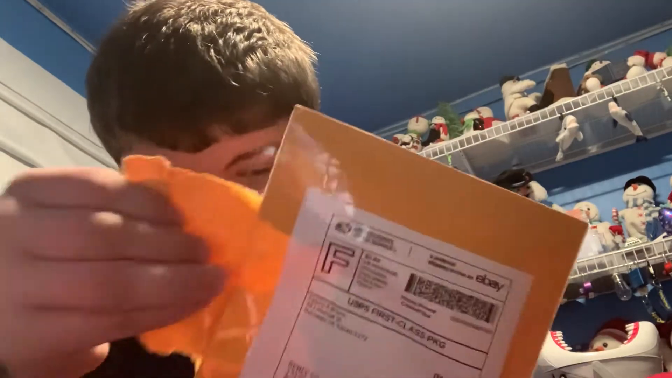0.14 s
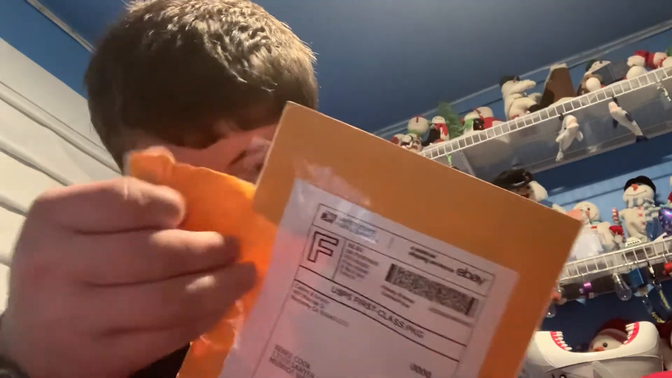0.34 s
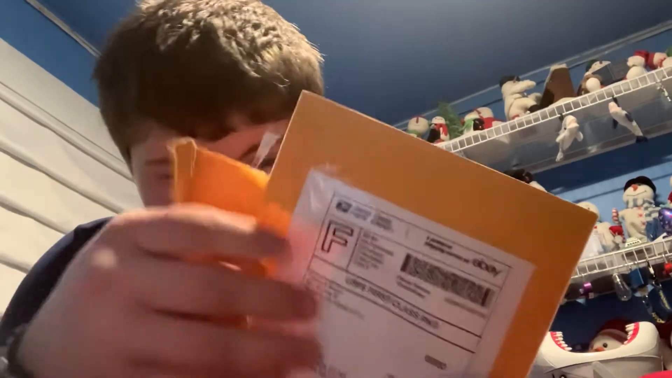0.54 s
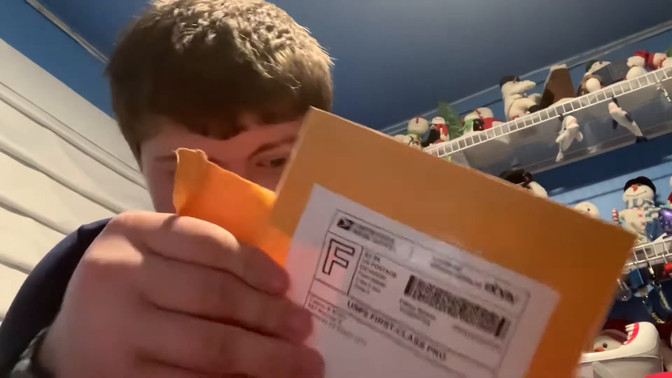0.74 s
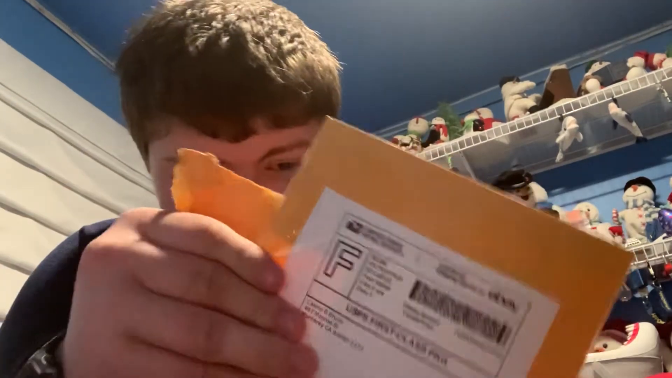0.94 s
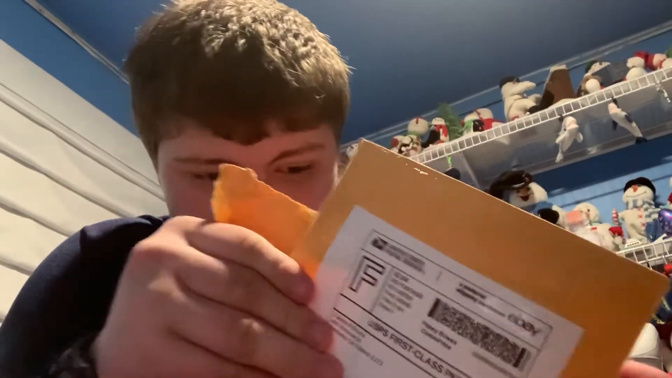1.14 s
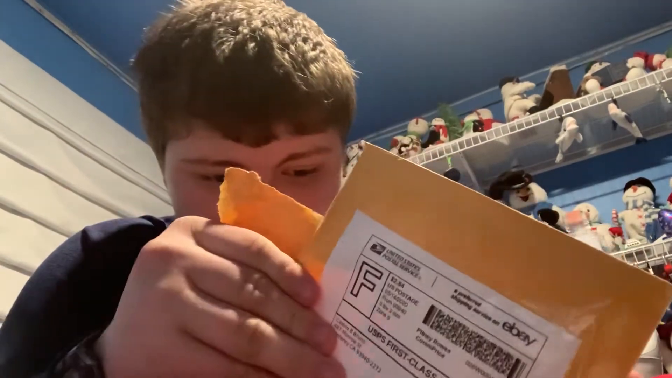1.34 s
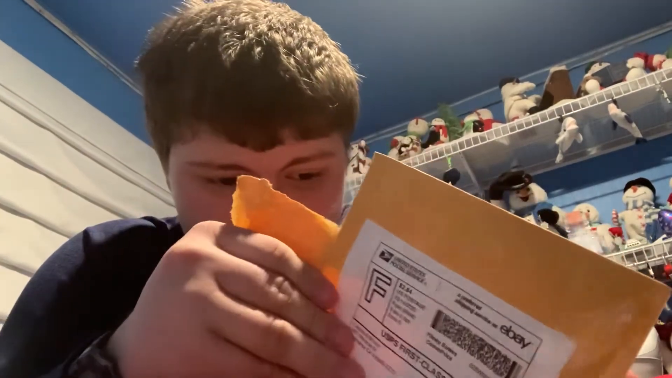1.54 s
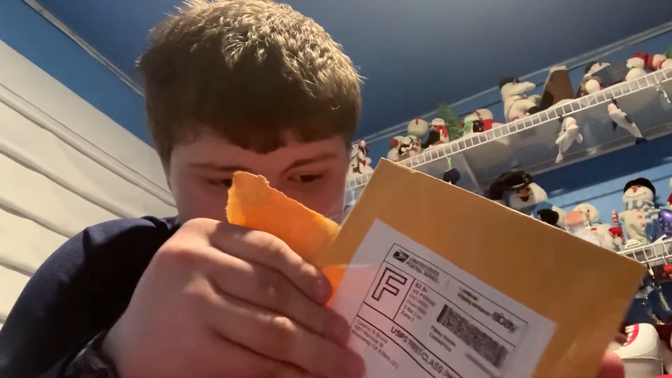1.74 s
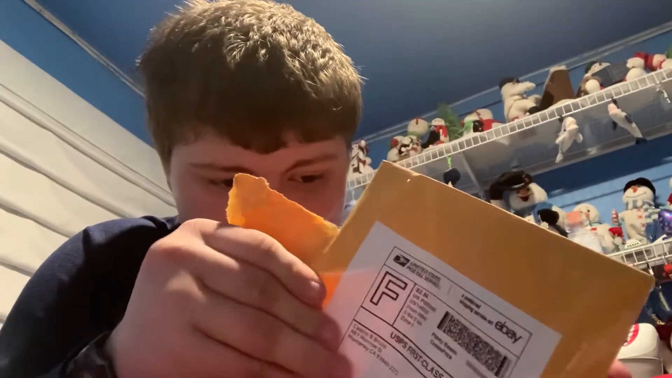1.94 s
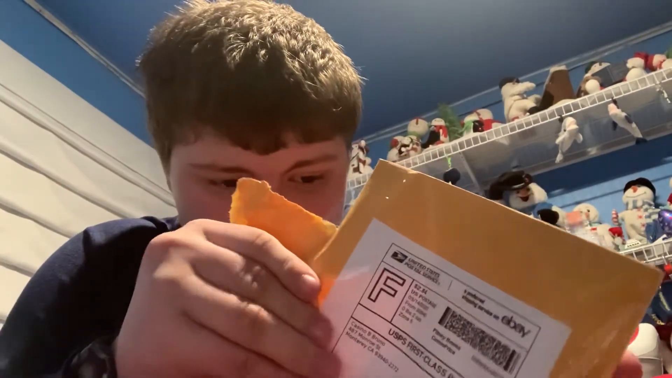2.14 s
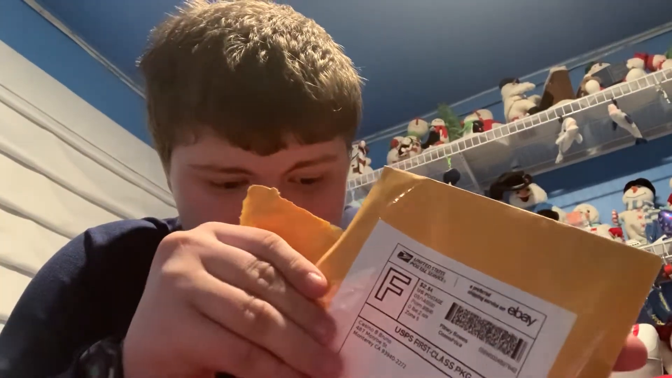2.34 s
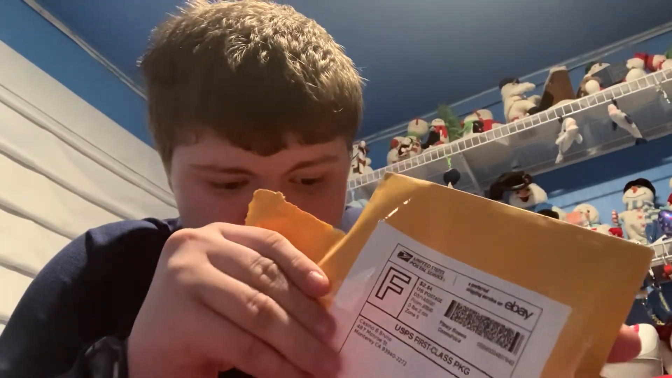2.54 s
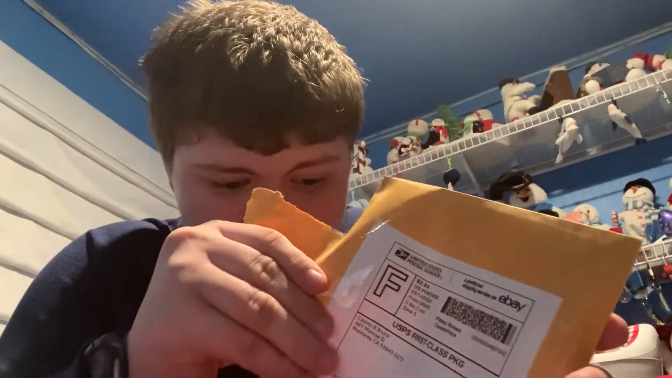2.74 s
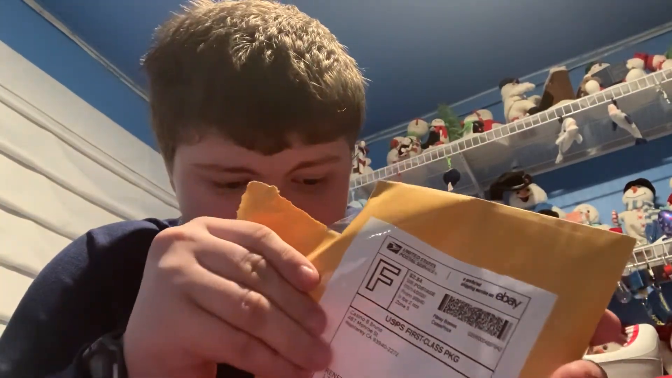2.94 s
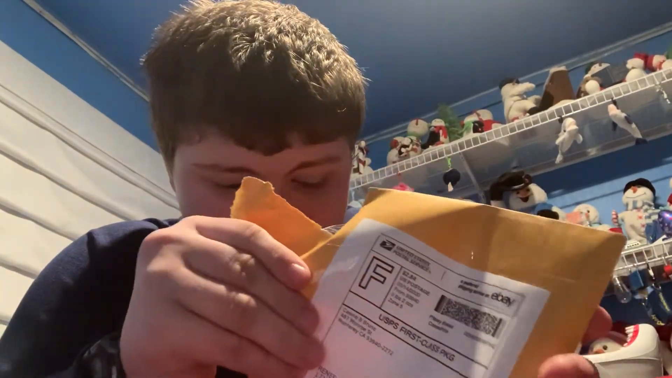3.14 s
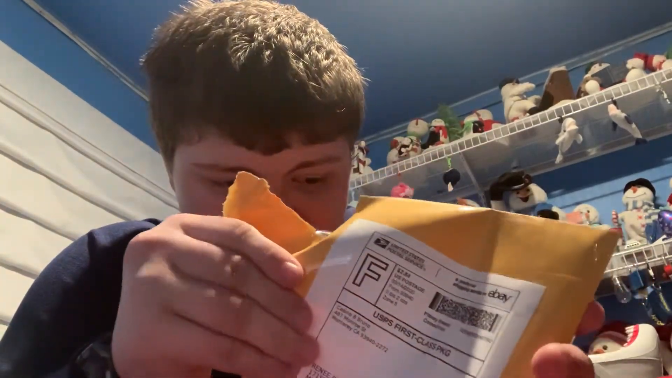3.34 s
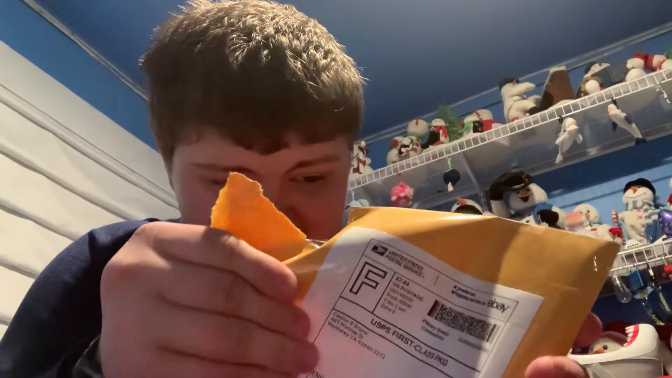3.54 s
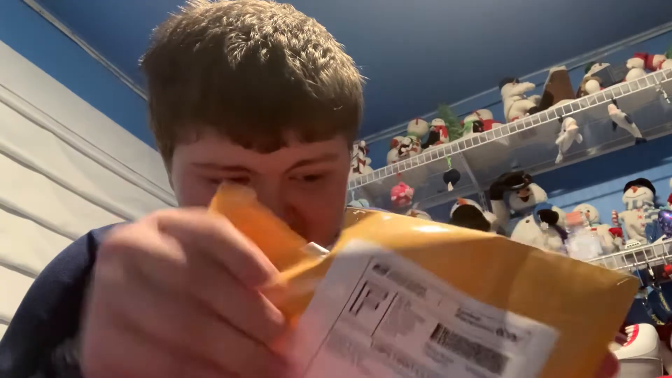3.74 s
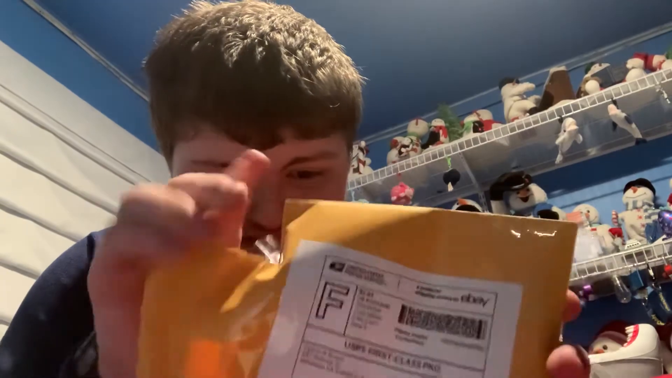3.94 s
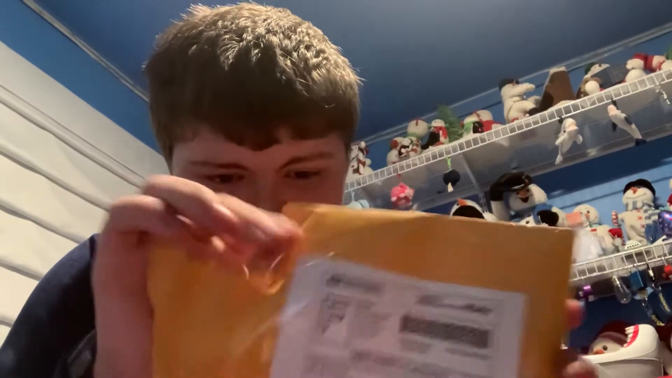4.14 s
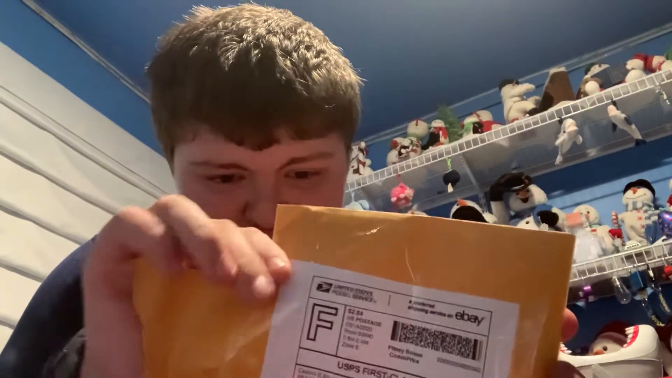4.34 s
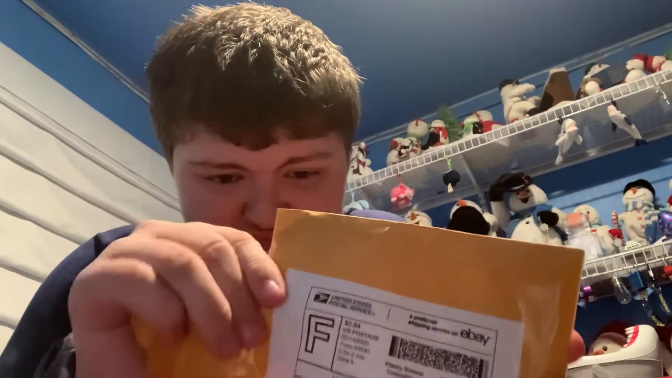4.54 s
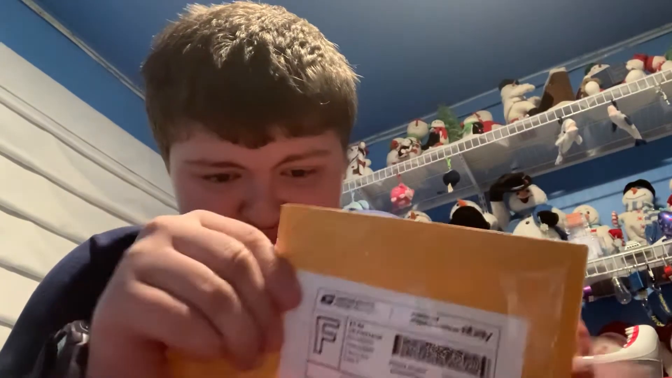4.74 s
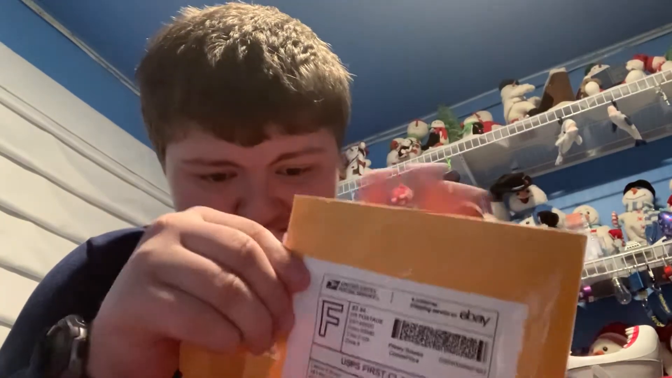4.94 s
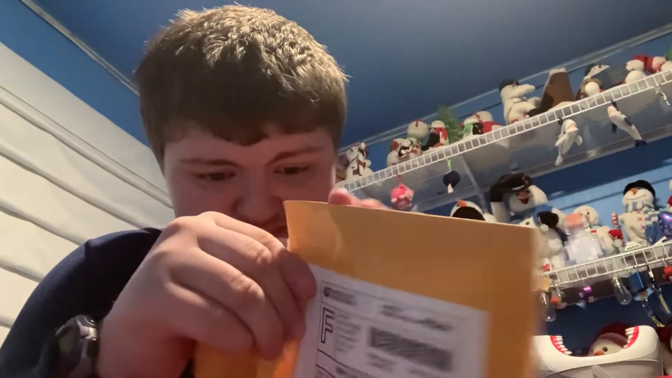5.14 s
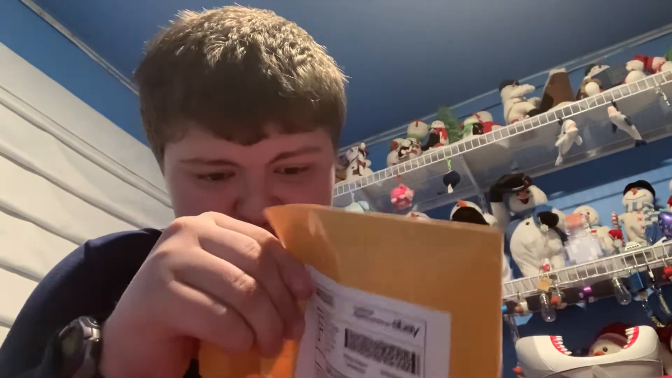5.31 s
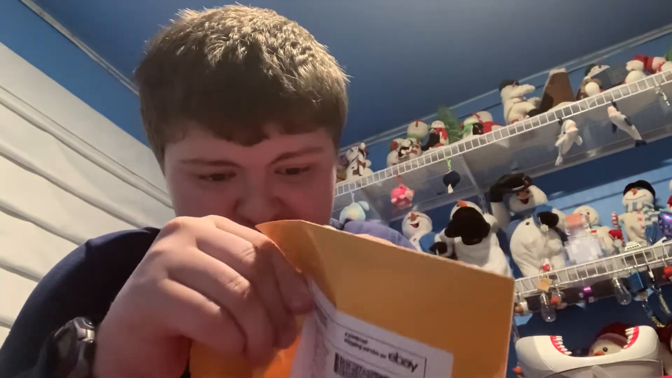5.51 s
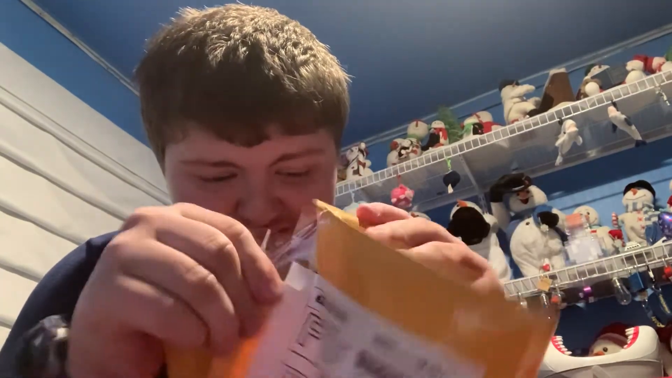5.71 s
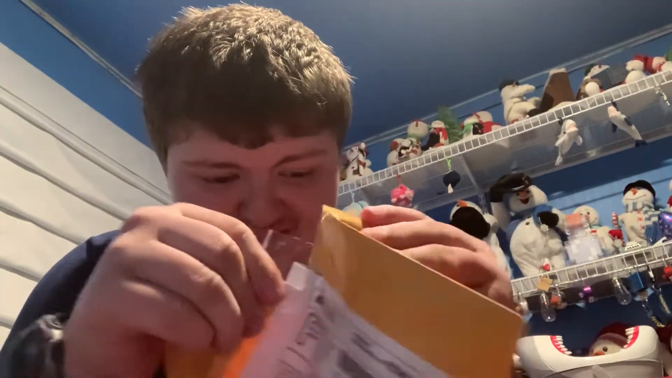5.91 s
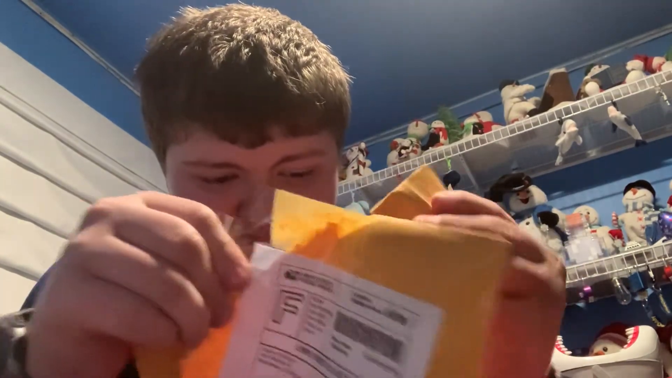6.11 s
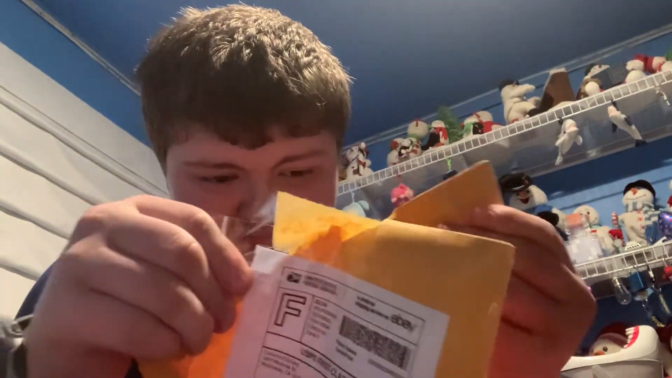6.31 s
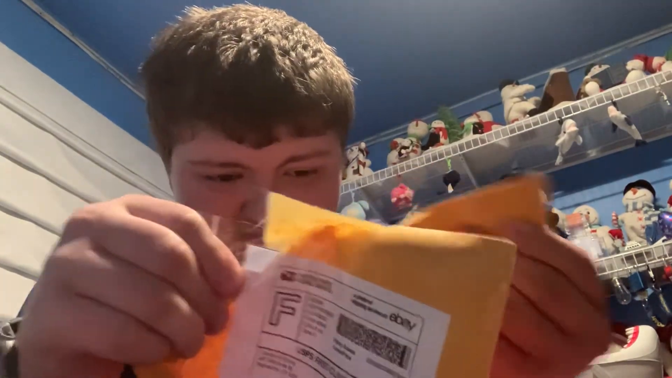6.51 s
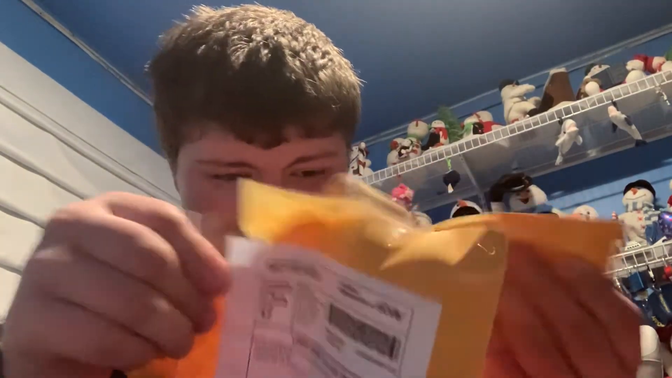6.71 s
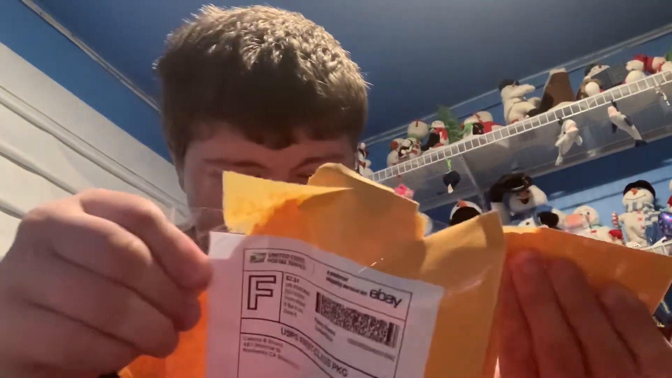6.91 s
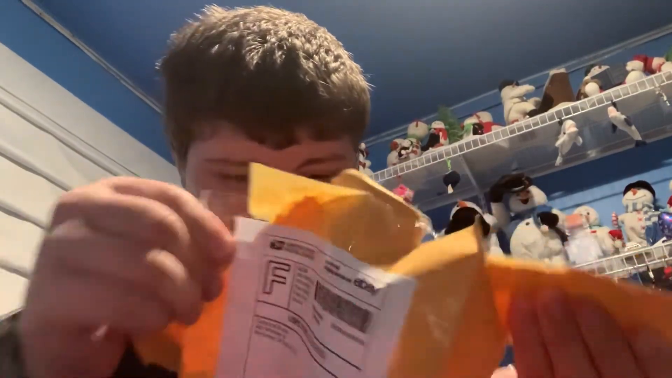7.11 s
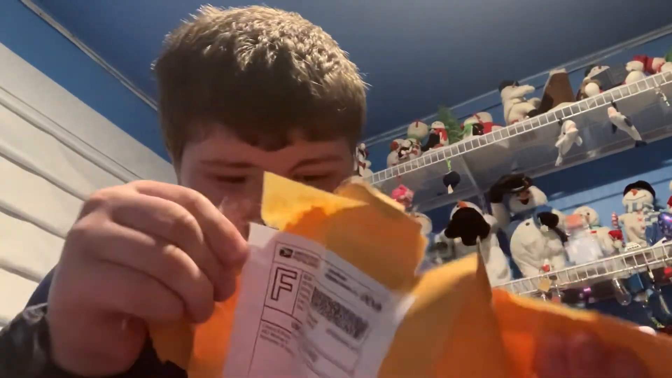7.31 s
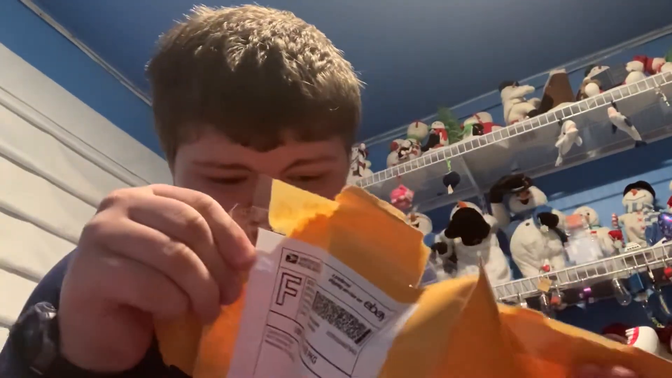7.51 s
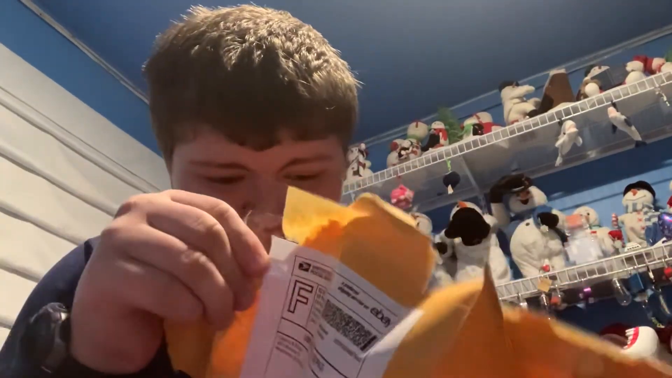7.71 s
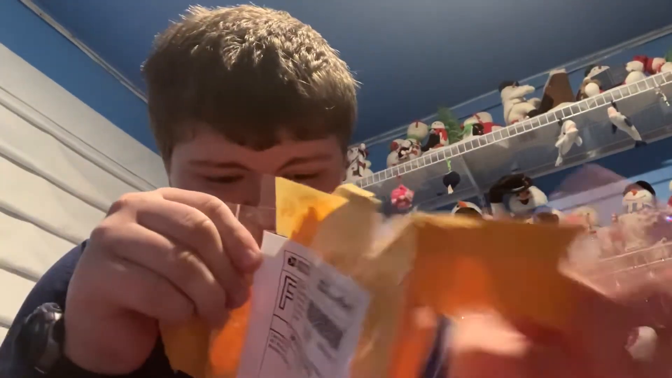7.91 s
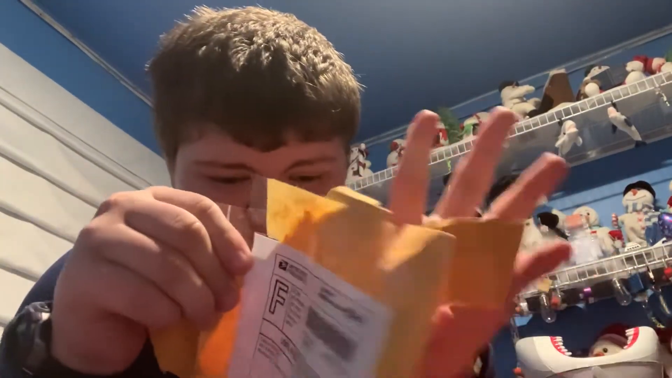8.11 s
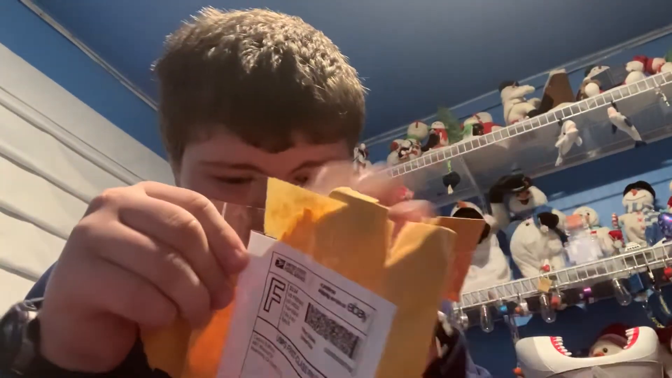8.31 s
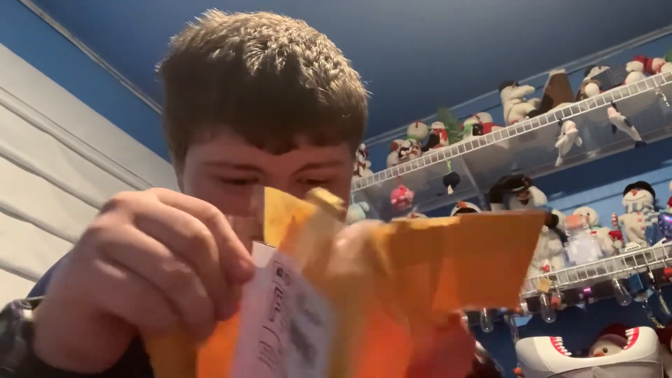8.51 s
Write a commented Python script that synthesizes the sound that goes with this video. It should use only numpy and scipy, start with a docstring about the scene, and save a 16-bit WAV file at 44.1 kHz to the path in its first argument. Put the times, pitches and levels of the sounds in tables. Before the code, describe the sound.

A padded paper envelope is handled close to a phone microphone in a small, dry room, over a faint, steady appliance hum. For the first five seconds or so the paper rustles softly and buckles, with irregular crease snaps and light finger scrapes on the flap. Sharper snaps stand out at about 0.7, 3.4, 4.4 and 5.1 seconds, those at 0.7 and 4.4 led by a brief hiss. From about 5.6 to 7.5 seconds comes the main tear, clearly louder: a string of short, uneven rips, dense with crackling fibres and sharp cracks, strongest around 5.7, 6.7 and 7.3 seconds. Some tugs carry through a table as faint low thuds, and the sheet gives dull knocks as it bends. After 7.5 seconds, softer rustling and a few small snaps continue until the end, at about 8.7 seconds.

```python
"""Hands tear open a padded paper envelope close to a phone in a small, dry room; an appliance hums.
First the sheet rustles and buckles, creases snap and fingers scrape a flap.
Hiss swells briefly just before the snaps at 0.66 and 4.4 s.
From 5.6 to 7.5 s the main tear: fibres part in dense showers, tugs thud faintly through the table.
Softer rustling follows to the end. Each break travels the sheet as bending waves, so its lows come late."""
import sys
import numpy as np
from scipy import signal
from scipy.fft import rfft, irfft, next_fast_len
from scipy.io import wavfile
from scipy.ndimage import uniform_filter1d

SR = 44100
rng = np.random.default_rng(int(sys.argv[2]) if len(sys.argv) > 2 else 0)


def digitize_waveform(pressure):
    """Quantize a signal to 16-bit integers and store it at the path in sys.argv[1].

    Rows of a 2-D input are taken as channels; values are limited to [-1, 1].
    """
    field = np.atleast_2d(pressure).T
    bounded = np.clip(field, -1, 1)
    quanta = np.round(bounded * 32767).astype(np.int16)
    wavfile.write(sys.argv[1], SR, quanta)


N = 381897

# paper bands flex, body, crack, fizz: name -> (low/Hz, high/Hz)
BANDS = {"flex": (150, 700), "body": (700, 2200), "crack": (2200, 5000), "fizz": (5000, 17000)}
# hum and air: f/Hz, relative spectral level/dB
ROOM_SPECTRUM = [(18, -47), (35, -13.5), (60, 5.5), (127, 11), (170, -3), (233, 3), (303, -8.5),
                 (1100, -27), (2750, -27), (5600, -45.5), (16000, -27)]
# padded pocket resonances: f/Hz, width/Hz, gain/dB
POCKET_MODES = [(412, 350, 8), (884, 280, -0.5), (1480, 660, 2), (2650, 400, 5), (3290, 1000, 7),
                (6780, 1600, -10.5)]
# tugs through the table: t/s, level/dB, f/Hz
TABLE_THUDS = [(1.599, -50, 48.4), (3.719, -43, 80.7), (4.423, -28, 86.1), (4.759, -44.5, 70.0),
               (5.666, -40, 48.4), (5.936, -38.5, 75.4), (6.038, -35, 83.4), (6.75, -33, 70.0),
               (7.748, -48, 59.2), (8.496, -52, 51.1)]
# paper sliding in the fingers: t/s, level/dB, tilt/(dB/oct)
RUSTLE_CURVE = [(0, -49.5, 0), (0.08, -74, -0.5), (0.19, -76, 3), (0.22, -63, -0.5), (0.3, -71.5, 2.5),
                (0.35, -67, 2.5), (0.43, -77, 1), (0.51, -55, 1.5), (0.59, -66, -1), (0.75, -61, 0.5),
                (0.89, -64, -0.2), (1.0, -66, 1.2), (1.16, -69, -0.5), (1.2, -68, 1.8), (1.33, -58, 1),
                (1.46, -66, 1), (1.66, -65, -0.5), (1.78, -63.5, -1.6), (1.83, -73, -1.2),
                (1.95, -66, -1.8), (2.05, -73.5, -1.5), (2.11, -65.5, -1.5), (2.18, -70, -0.8),
                (2.32, -69.5, -0.2), (2.54, -62, 0), (2.73, -65.5, 1.3), (2.9, -51, 1), (2.965, -64, 0.5),
                (3.03, -55.5, 2.3), (3.17, -58, -0.4), (3.25, -46, 1.2), (3.33, -57.5, 1.4),
                (3.59, -71, 3.5), (3.69, -59, -1.5), (3.74, -46, 0.9), (3.82, -54.5, 0.4),
                (3.89, -49, -0.7), (3.95, -65.5, -0.7), (4.05, -62.5, -0.7), (4.15, -51.5, 2.2),
                (4.25, -67, 0.2), (4.37, -62, 1.5), (4.58, -64.5, -1.0), (4.75, -53, 0), (4.96, -62.5, 0.3),
                (5.08, -58, -0.5), (5.23, -64.5, 0.5), (5.29, -55.5, -0.0), (5.385, -65, 1.3),
                (5.57, -57.5, 2.0), (5.81, -66, 0.1), (6.15, -68.5, -0.5), (6.2, -58, 3.7), (6.4, -60, 3),
                (6.63, -62.5, 2.7), (6.97, -69, -2), (7.0, -63.5, -1), (7.1, -49.5, -1.4),
                (7.22, -57.5, -1.5), (7.4, -64, -1.5), (7.63, -64.5, -3.5), (7.73, -51.5, 1.5),
                (7.8, -63.5, 3), (7.86, -57, -0.1), (7.97, -68, -1), (8.05, -60.5, 0.7), (8.11, -64.5, 0.2),
                (8.32, -78, 0), (8.4, -58.5, 0.3), (8.46, -48, -1), (8.54, -60, 0.2), (8.65, -51, 0.1)]
# fingers on a taut flap: start/s, peak/s, end/s, level/dB, f/Hz; silent if end < start
FLAP_SCRAPES = [(1.24, 1.335, 1.34, -50, 3190), (3.7, 3.76, 3.83, -52, 3480),
                (3.807, 3.857, 3.93, -43.5, 3420), (3.962, 3.98, 4.006, -44.5, 3530),
                (4.01, 4.15, 4.21, -48.5, 3530), (4.207, 4.328, 4.38, -54, 3560),
                (5.635, 5.66, 5.72, -25, 1606), (5.93, 5.956, 6.0, -31, 1556),
                (6.204, 6.278, 6.38, -40, 1590), (6.22, 6.29, 6.35, -41, 3440),
                (6.327, 6.357, 5.8, -53, 1533)]
# whole sheet buckling: t/s, level/dB, f/Hz
SHEET_BUCKLES = [(0.014, -26, 910), (0.1, -42.5, 510), (0.338, -45, 516), (0.562, -44.5, 505),
                 (0.614, -35.5, 345), (0.863, -43, 315), (0.939, -36, 484), (1.078, -46, 420),
                 (1.145, -46, 382), (1.416, -23.5, 720), (1.482, -35.5, 315), (1.515, -46, 470),
                 (1.538, -40, 340), (1.596, -33.5, 150), (1.735, -55, 326), (2.207, -45, 440),
                 (2.24, -44, 468), (3.42, -39, 610), (3.48, -38, 160), (3.52, -39, 455),
                 (3.709, -31.5, 420), (3.772, -32.5, 445), (3.86, -27, 440), (4.3, -39, 363),
                 (4.357, -27, 377), (4.383, -34, 406), (4.42, -23, 392), (4.749, -29.5, 246),
                 (5.75, -38, 420), (6.036, -27.5, 160), (6.495, -30.5, 500), (6.682, -29, 760),
                 (6.699, -17, 900), (7.114, -22, 563), (7.261, -11.5, 780), (7.268, -22.5, 190),
                 (7.292, -20, 800), (7.492, -14, 374), (7.628, -40, 330), (7.675, -33.5, 357),
                 (7.735, -37.5, 300), (7.885, -42.5, 200), (7.904, -44, 490), (8.043, -49, 300),
                 (8.168, -52.5, 225), (8.444, -42, 566), (8.503, -41, 244), (8.58, -30.5, 402)]
# creases and glue letting go: t/s, level/dB, tilt/(dB/oct), extra flex/dB
CREASE_SNAPS = [(0.1018, -53, -15, 1.2), (0.2056, -38.5, 0.8, 1.2), (0.2303, -52, 0, 1.2),
                (0.265, -42.5, 1.5, 1.2), (0.3201, -44, -0.1, 1.2), (0.6586, -19, -3.5, 1.2),
                (0.6882, -46, -3.5, 1.2), (0.8048, -45, -0.1, 1.2), (0.862, -37, -5.5, 1.2),
                (0.91, -45, -3, 1.2), (0.9221, -28.5, -4, 1.2), (1.1178, -52.5, 3.5, 1.2),
                (1.334, -33, -4.5, 1.2), (1.386, -42.5, -2.5, 1.2), (1.4143, -28, -8.5, 1.2),
                (1.4756, -43, -2.1, 1.2), (1.505, -33.5, 2.5, 1.2), (1.5157, -41, -10, 1.2),
                (1.5362, -42.5, -12, 1.2), (1.5885, -23.5, -7, 1.2), (1.594, -29.0, -6, 1.2),
                (1.735, -39, -4, 1.2), (2.2042, -49.5, 0.8, 1.2), (2.2537, -40, 1.0, 1.2),
                (2.4203, -44.5, 1.5, 1.2), (2.482, -42.5, 1.4, 1.2), (2.505, -49, 0.5, 1.2),
                (2.5297, -41, 0.5, 1.2), (2.5548, -40.0, 2.1, 1.2), (2.5968, -36, 0.7, 1.2),
                (2.6237, -36.5, 1.2, 1.2), (2.699, -41.5, -0.4, 1.2), (2.7897, -38.5, 1.2, 1.2),
                (2.8177, -37, 0, 1.2), (2.843, -33.5, -2.5, 1.2), (2.861, -34, -1, 1.2),
                (2.8924, -29, -0.2, 1.2), (2.92, -34.5, -0.5, 1.2), (2.9884, -35.5, -0.5, 1.2),
                (3.014, -23.5, -4, 1.2), (3.0246, -33, -5, 1.2), (3.0535, -24.5, -3, 1.2),
                (3.1147, -32, -0.5, 1.2), (3.192, -35.5, -2, 1.2), (3.219, -33.0, 0.7, 1.2),
                (3.339, -45, 2.1, 1.2), (3.368, -18, 0.5, 1.2), (3.4195, -34.5, -5.5, 1.2),
                (3.4545, -14.5, 0, 1.2), (3.4768, -11.5, -0.5, 1.2), (3.521, -41, -5.5, 1.2),
                (3.553, -27, 2, 1.2), (3.601, -43, 2, 1.2), (3.6098, -36.5, 0.7, 1.2),
                (3.6416, -46, 2.5, 1.2), (3.709, -37.5, -0.5, 1.2), (3.7319, -33.5, 3, 1.2),
                (3.85, -32.5, -3, 1.2), (3.898, -37, -0.7, 1.2), (3.981, -33, -2.5, 1.2),
                (4.024, -45, 0.5, 1.2), (4.1438, -27.5, -2.2, 1.2), (4.2135, -29, -5.5, 1.2),
                (4.3368, -33.5, -10, 1.2), (4.3863, -23.5, -6.5, 1.2), (4.408, -18.5, -1.5, 1.2),
                (4.4209, -13, -3.5, 1.2), (4.709, -35.5, -7.5, 1.2), (4.7705, -23.5, 1.2, 1.2),
                (4.829, -47, 1.5, 1.2), (5.0366, -43, 3.5, 1.2), (5.104, -16.5, -2.5, 1.2),
                (5.1267, -35, -3, 1.2), (5.1425, -45, 0.5, 1.2), (5.1848, -35.5, 5, 1.2),
                (5.281, -41.5, 1.5, 1.2), (5.4172, -25.5, 0, 1.2), (5.478, -40.5, 1.5, 1.2),
                (5.51, -18, 0.6, 1.2), (5.56, -45.5, 5.5, 1.2), (5.5744, -44, 2.7, 1.2),
                (5.594, -15, 2.5, 1.2), (5.6258, -13.5, 2.8, 1.2), (5.6312, -14.5, -0.7, 1.2),
                (5.6367, -9.5, 4.8, 1.2), (5.644, -8.5, -1, 1.2), (5.653, -9.5, 5, 1.2),
                (5.657, -10.5, 0.2, 1.2), (5.6633, -16, 4, 1.2), (5.675, -6.5, 0.6, 1.2),
                (5.6806, -20.5, 0.3, 1.2), (5.837, -38.5, -10.5, 1.2), (5.8514, -32.5, -3, 1.2),
                (5.931, -20, -2.8, 1.2), (5.9935, -28, 7, 1.2), (6.0004, -21, 0.5, 1.2),
                (6.0295, -12, 0.0, 1.2), (6.2142, -39.5, 5.5, 1.2), (6.2213, -36, 3.4, 1.2),
                (6.249, -42, 6.7, 1.2), (6.265, -31, 4.6, 1.2), (6.351, -40, 1.5, 1.2),
                (6.364, -36.5, 2.5, 1.2), (6.408, -45, 5, 1.2), (6.4205, -41, 5, 1.2),
                (6.4379, -53, 4, 1.2), (6.472, -24, 5.5, 1.2), (6.5089, -25, 4.5, 1.2),
                (6.5458, -19, -2.2, 1.2), (6.591, -32, -1, 1.2), (6.6484, -44.5, 0.5, 1.2),
                (6.6775, -26.5, -2.2, 1.2), (6.6917, -12.5, 4, 1.2), (6.6988, -11, -6, 1.2),
                (6.7153, -20.5, 1.3, 1.2), (6.7313, -6, -1.5, 1.2), (6.7393, -16.5, -1.8, 1.2),
                (6.75, -7.5, -0.4, 1.2), (6.7677, -7, -3.5, 1.2), (6.7922, -21, 2, 1.2),
                (7.0662, -43.5, 3, 1.2), (7.1623, -41, 4.5, 1.2), (7.184, -45.5, 6.5, 1.2),
                (7.2147, -46, 5, 1.2), (7.2364, -39.0, -1, 1.2), (7.248, -30.5, 0.5, 1.2),
                (7.2619, -5, -0.4, 1.2), (7.2925, -9.5, -0.1, 1.2), (7.34, -26.5, -5.3, 1.2),
                (7.4052, -48.5, 3, 1.2), (7.4294, -49.5, 4.5, 1.2), (7.443, -39, 0.8, 1.2),
                (7.4929, -16, -7.5, 1.2), (7.5126, -26.5, 2.5, 1.2), (7.5246, -19.5, -0.5, 1.2),
                (7.7766, -36.0, 4.5, 1.2), (7.855, -46, 5.5, 1.2), (7.9012, -38.5, -7.5, 1.2),
                (8.3987, -32, -1.5, 1.2), (8.447, -28, 0.5, 1.2), (8.479, -32, -0.5, 1.2),
                (8.5064, -39, -14, 1.2)]
# two brief swells of hiss just before snaps, then the swells of the tear:
# t/s, attack/s, hold/s, level/dB, change over hold/dB, tilt/(dB/oct), extra flex/dB
SWELLS = [(.632, .022, .006, -47, -5, -1, 0), (4.38, .04, .012, -41.5, -15, -5.5, -1),
          (5.594, 0.0036, 0.027, -39, -0.5, -0.3, 3), (5.622, .012, .05, -24.5, -7.5, -1.5, -9),
          (5.842, 0.0082, 0.087, -44, 3.5, -.3, 1.5), (5.925, 0.01, 0.069, -27.5, -1, 0.4, -1),
          (6.011, .02, .014, -25, -8, 2.3, 7), (6.21, .06, .045, -40, -0.5, 2.5, -1),
          (6.466, 0.018, 0.11, -32, -6, 2, 0), (6.674, .024, .1, -27, -8.5, 0.9, -3),
          (7.242, 0.023, 0.073, -31.5, -11, 2.2, 8.5), (7.44, 0.029, .03, -26.5, -9, 1.2, 2),
          (7.508, .008, .014, -31, -13.5, 3.5, 2)]

# offsets per band
RUSTLE_DB = (0.24, .1, -0.25, -0.59)
SNAP_DB = (-13.5, -3, 0.5, 1)
SWELL_DB = (-6.5, -1.5, -2.2, -2.46)
TIME_S = np.arange(N) / SR


def amp(db):
    """dB to gain."""
    return 10 ** (np.asarray(db) / 20)


def place(times_s, grains):
    """Mix rows of short sounds in at their times."""
    at = (np.asarray(times_s) * SR).astype(int)[:, None] + np.arange(grains.shape[1])
    return np.bincount(at.ravel(), grains.ravel(), N + grains.shape[1])[:N]


def split(x):
    """Four bands along the last axis, with half-octave cross-fades."""
    size = next_fast_len(x.shape[-1])
    spectrum, octave = rfft(x, size), np.log2(np.fft.rfftfreq(size, 1 / SR) + 1)
    above = lambda hz: np.sin(np.pi / 2 * np.clip((octave - np.log2(hz)) * 2 + .5, 0, 1)) ** 2
    return [irfft(spectrum * (above(lo) - above(hi)), size)[..., :x.shape[-1]]
            for lo, hi in BANDS.values()]


def band_levels(db, tilt_db_oct, offsets_db, flex_share):
    """dB per band, tilted about 2 kHz; flex takes only a share of the tilt."""
    centres_hz = np.sqrt(np.prod(list(BANDS.values()), axis=1))
    octaves = np.log2(centres_hz / 2000)
    octaves[0] *= flex_share
    return db + np.array(offsets_db)[:, None] + octaves[:, None] * tilt_db_oct


def room_tone(rms_db=-61.5):
    """Steady appliance hum and air, as shaped noise."""
    hz, db = np.transpose(ROOM_SPECTRUM)
    bins_hz = np.fft.rfftfreq(N, 1 / SR)
    shape = amp(np.interp(np.log(bins_hz + 1), np.log(hz), db))
    noise = irfft(rfft(rng.standard_normal(N)) * shape, N)
    return noise * amp(rms_db) / noise.std()


def room_tail(x, t60_s=.1, level_db=-14, rise_s=.001):
    """Diffuse echo, kept short by soft furnishings."""
    t = np.arange(SR // 4) / SR
    tail = rng.standard_normal(len(t)) * amp(-60 * t / t60_s) * np.clip(t / rise_s, 0, 1)
    return signal.fftconvolve(x, tail * amp(level_db) / np.linalg.norm(tail))[:N]


def knocks(table, peak_cycles, glide):
    """Low pushes that ring a few cycles and sag in pitch."""
    start_s, db, hz = np.transpose(table)[:, :, None]
    cycles = np.arange(4096) / SR * hz
    age = cycles / peak_cycles
    envelope = np.sqrt(age) * np.exp(1 - age)
    phase = 2 * np.pi * cycles * (1 + glide * np.exp(-age))
    return place(start_s[:, 0], amp(db) * envelope * np.sin(phase))


def thuds():
    """Tugs carried through the table."""
    return knocks(TABLE_THUDS, peak_cycles=0.6, glide=0.93)


def pocket(x):
    """The envelope adds its own resonances."""
    return x + sum(amp(db) * signal.lfilter(*signal.iirpeak(hz, hz / width_hz, SR), x)
                   for hz, width_hz, db in POCKET_MODES)


def grip(rate_hz):
    """Unsteady grip: ramps between random values, unit spread."""
    step = int(SR / rate_hz)
    ramps = uniform_filter1d(np.repeat(rng.standard_normal(N // step + 1), step), step)[:N]
    return ramps / ramps.std()


def bending_waves(burst_ms, lag_ms, top_hz, size, echo_db=-11.5):
    """One break per row, dispersed by the sheet: wave speed grows as the root of frequency."""
    t, count = np.arange(size) / SR, len(burst_ms)
    hz = np.fft.rfftfreq(size, 1 / SR)
    decay_s = np.clip(burst_ms, .1, 6)[:, None] / 1000
    burst = rng.standard_normal((count, size)) * np.exp(-t / decay_s)
    burst[:, 0] += 4 * np.sign(burst[:, 0])  # sharp first release
    dispersion_rad_s = 4 * np.pi * np.sqrt(1000 * hz) - 2 * np.pi * hz * np.sqrt(1000 / (SR / 2))
    distance, *detours = rng.random((count, 3)).T[:, :, None]
    lag_s = lag_ms / 1000 * (.6 + .8 * distance)
    paths = np.exp(-1j * dispersion_rad_s * lag_s)
    for detour in detours:  # two edge reflections
        phase = lag_s * ((1 + detour) * dispersion_rad_s + 2 * np.pi * hz * detour)
        paths -= amp(echo_db) * np.exp(-1j * phase)
    lowpass = 1 / np.sqrt(1 + (hz / top_hz) ** 2)
    fade = np.cos(np.pi / 2 * t / t[-1])
    return irfft(rfft(burst) * paths * lowpass, size) * fade


def fibre_shower(gains, per_s, spread_db, hiss_db, grip_db, burst_ms, lag_ms, top_hz):
    """Fibres part at random times and strengths over the hiss of rubbing paper."""
    active = gains[0] > 0
    draws = rng.random((int(per_s * N / SR), 3))
    when, strength, length = draws[active[(draws[:, 0] * N).astype(int)]].T
    size_db = -spread_db * np.log(1 - strength[:, None])
    breaks = bending_waves(burst_ms * (.5 + length), lag_ms, top_hz, size=512)
    crackle = place(when * N / SR, breaks * amp(size_db))
    hiss = signal.lfilter([1], [1, -.3], rng.standard_normal(N)) * amp(grip_db * grip(rate_hz=150))
    mix = pocket(crackle / crackle[active].std() + amp(hiss_db) * hiss / hiss.std())
    out = 0
    for band, gain in zip(split(mix), gains):
        band = band * amp(grip_db * grip(rate_hz=55))  # colour shifts with the grip
        out += gain * band / band[active].std()
    return out


def rustle(settle_db=-25.5, rise_s=.0027, decay_s=.015):
    """Paper crinkles in the fingers and settles after each snap."""
    knots_s, db, tilt = np.transpose(RUSTLE_CURVE)
    db, tilt = np.interp(TIME_S, knots_s, db), np.interp(TIME_S, knots_s, tilt)
    sliding = amp(band_levels(db, tilt, RUSTLE_DB, flex_share=.97))
    snap_s, snap_db, snap_tilt, _ = np.transpose(CREASE_SNAPS)
    t = TIME_S[:4096]
    envelope = np.exp(-t / decay_s) * (1 - np.exp(-t / rise_s))
    levels_db = band_levels(snap_db + settle_db, .91 * snap_tilt, RUSTLE_DB, flex_share=.69)
    settling = [place(snap_s, gain[:, None] * envelope) for gain in amp(levels_db)]
    return fibre_shower(sliding + settling, per_s=800, spread_db=2.3, hiss_db=1.5, grip_db=1.8,
                        burst_ms=.8, lag_ms=2.4, top_hz=6000)


def scrapes(edge_db=-20):
    """Fingers scrape a taut flap: narrow, rough hiss around its resonance."""
    rough = uniform_filter1d(uniform_filter1d(rng.standard_normal((2, N)), size=40), size=40)
    rough = rough / rough.std() * amp(2 * grip(rate_hz=96))
    out = 0
    for *knots_s, db, hz in FLAP_SCRAPES:
        phase = 2 * np.pi * hz * TIME_S
        swell_db = np.interp(TIME_S, knots_s, [edge_db, 0, edge_db], left=-200, right=-200)
        out += amp(db + swell_db) * (rough[0] * np.cos(phase) + rough[1] * np.sin(phase))
    return out


def buckles():
    """The whole sheet gives way with a dull knock."""
    return knocks(SHEET_BUCKLES, peak_cycles=0.68, glide=0.5)


def snaps():
    """Creases and glue let go: duller or weaker snaps are slower and further off."""
    start_s, db, tilt, flex_db = np.transpose(CREASE_SNAPS)
    stretch = 2 ** np.clip(-.12 * tilt - .015 * (db - db.mean()), -1, 1)
    breaks = bending_waves(burst_ms=1.18 * stretch, lag_ms=2.4 * np.sqrt(stretch)[:, None],
                           top_hz=9000 / stretch[:, None], size=1024)
    peaks_db = band_levels(db, tilt, SNAP_DB, flex_share=.33)
    peaks_db[0] += flex_db
    grains = sum(band * (peak / np.abs(band).max(axis=1))[:, None]
                 for band, peak in zip(split(pocket(breaks)), amp(peaks_db)))
    return place(start_s, grains)


def hiss_and_tear(rise_db=26, release_s=.15, release_db_per_s=700.5):
    """Two brief swells of hiss, then the tear's showers of parting fibres; each rises, holds, dies."""
    gains = np.zeros((4, N))
    for start_s, attack_s, hold_s, db, change_db, tilt, flex_db in SWELLS:
        knots_s = np.cumsum([start_s, attack_s, hold_s, release_s])
        on = (TIME_S >= start_s) & (TIME_S < knots_s[-1])
        end_db = change_db - release_s * release_db_per_s
        shape_db = np.interp(TIME_S[on], knots_s, [-rise_db, 0, change_db, end_db])
        levels_db = band_levels(db + shape_db, tilt, SWELL_DB, flex_share=.7)
        levels_db[0] += flex_db
        gains[:, on] += amp(levels_db)
    return fibre_shower(gains, per_s=1500, spread_db=2.5, hiss_db=-2.5, grip_db=2,
                        burst_ms=.7, lag_ms=2.2, top_hz=10000)


def scene():
    """Paper, its echo, thuds and room tone; mono."""
    paper = rustle() + hiss_and_tear() + snaps() + buckles() + scrapes()
    return (paper + room_tail(paper) + thuds() + room_tone())[None]


def record(dry):
    """The phone drops the deepest bass, rounds the loudest peaks and cuts the top."""
    highpass = signal.butter(4, 38, "highpass", fs=SR, output="sos")
    lowpass = signal.ellip(12, .2, 95, 15800, fs=SR, output="sos")
    rounded = 1.3 * np.tanh(signal.sosfilt(highpass, dry) / 1.3)
    return signal.sosfilt(lowpass, rounded)


dry = scene()
out = record(dry)
digitize_waveform(out)
```